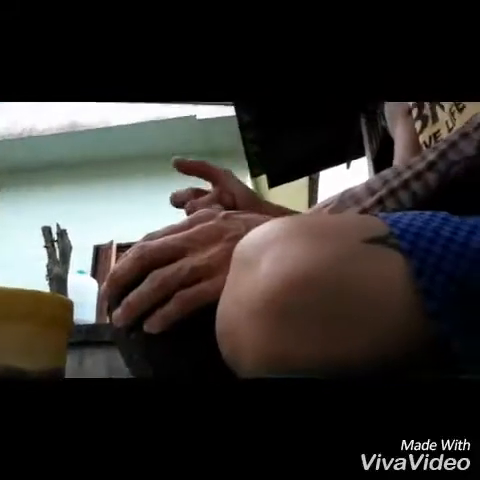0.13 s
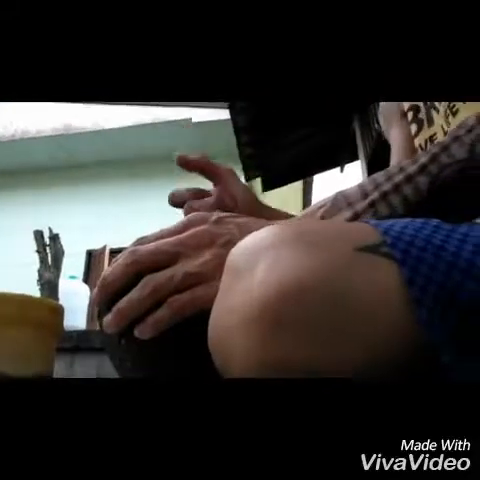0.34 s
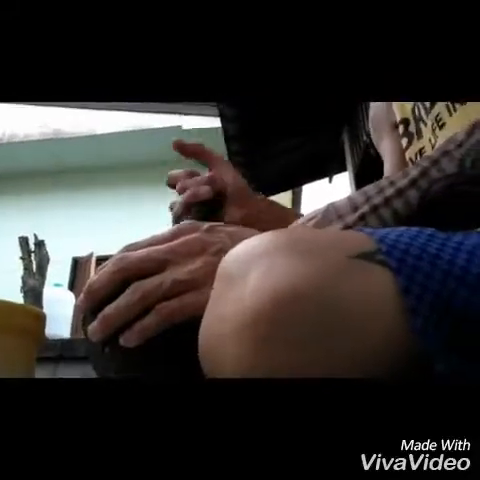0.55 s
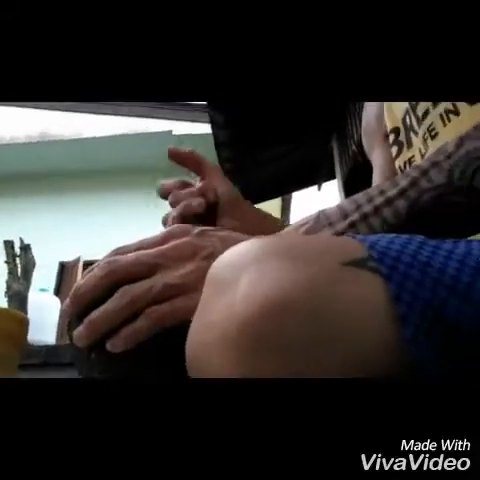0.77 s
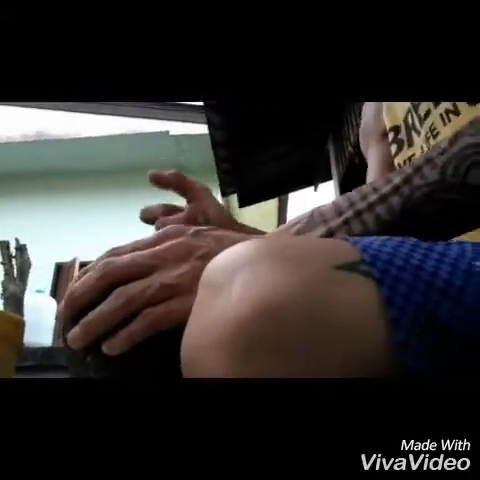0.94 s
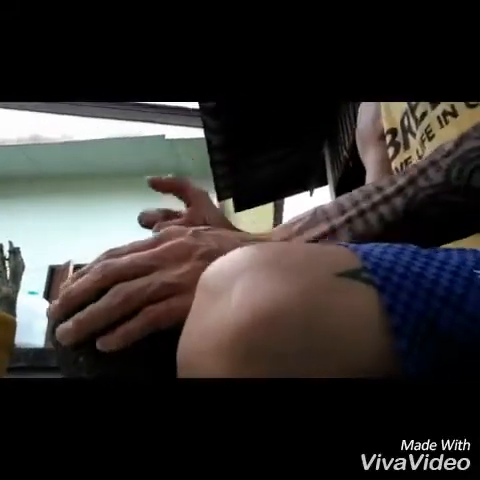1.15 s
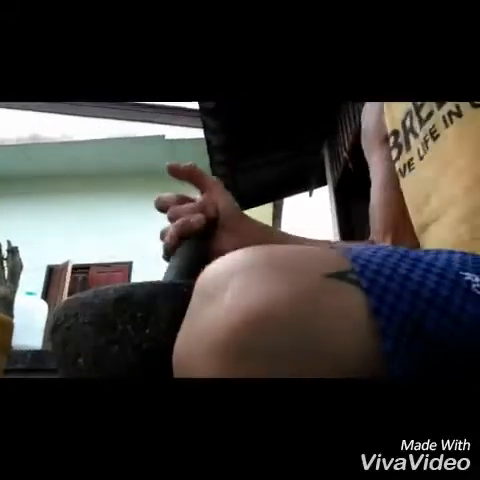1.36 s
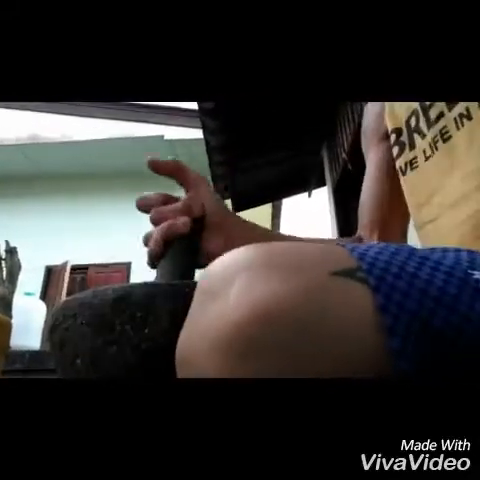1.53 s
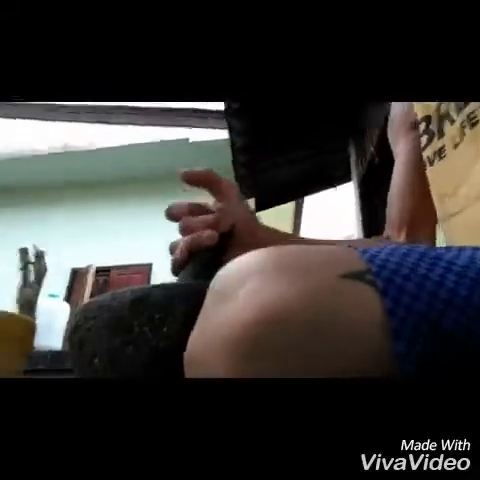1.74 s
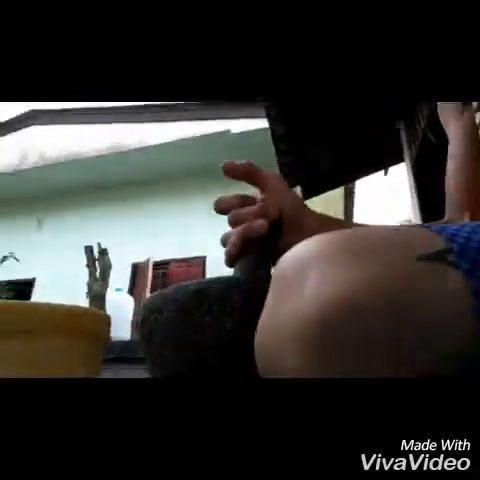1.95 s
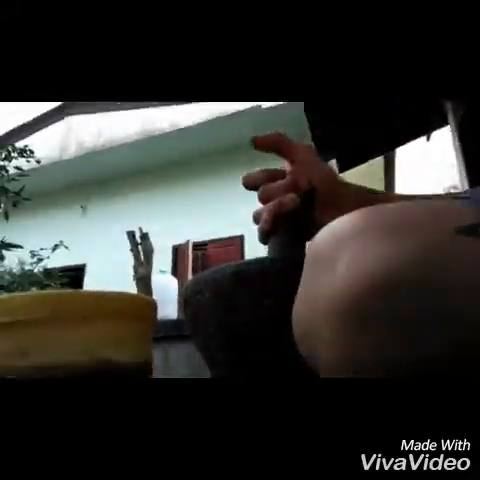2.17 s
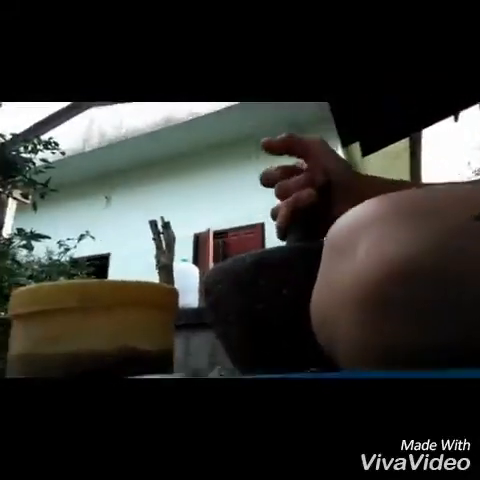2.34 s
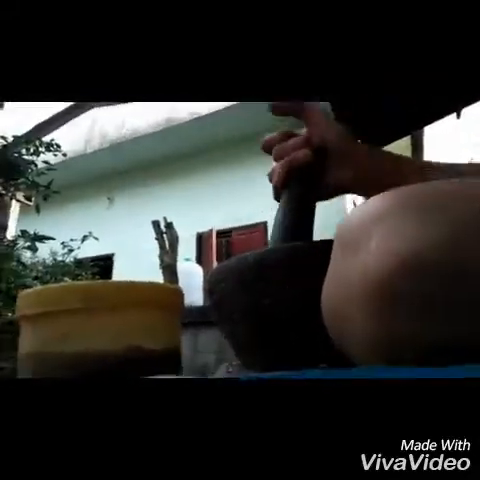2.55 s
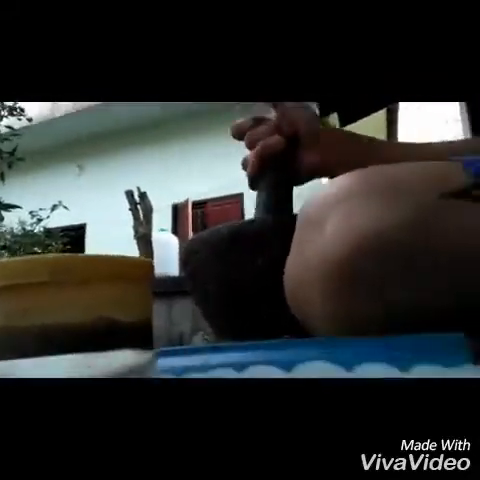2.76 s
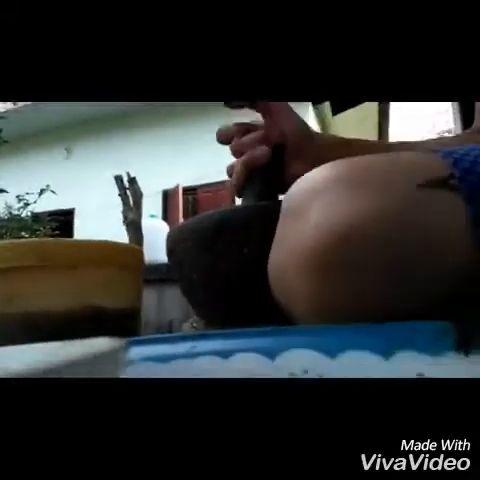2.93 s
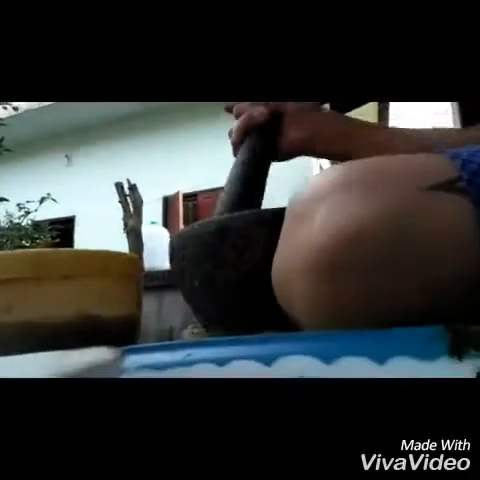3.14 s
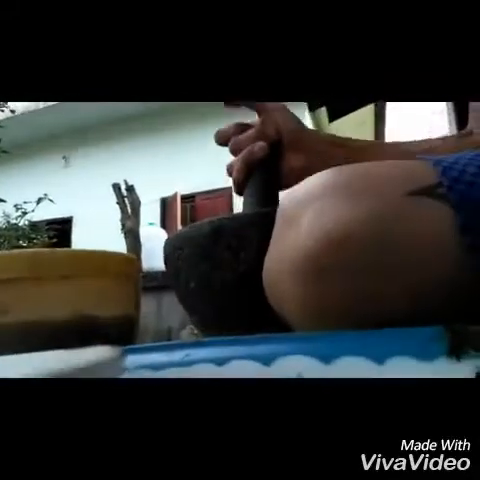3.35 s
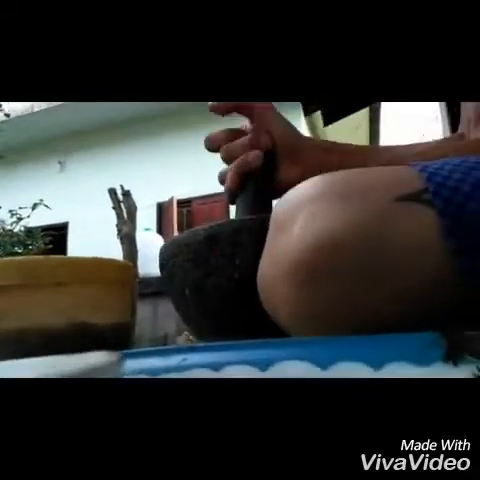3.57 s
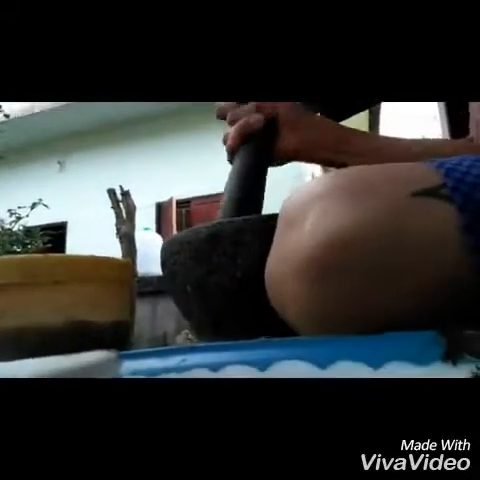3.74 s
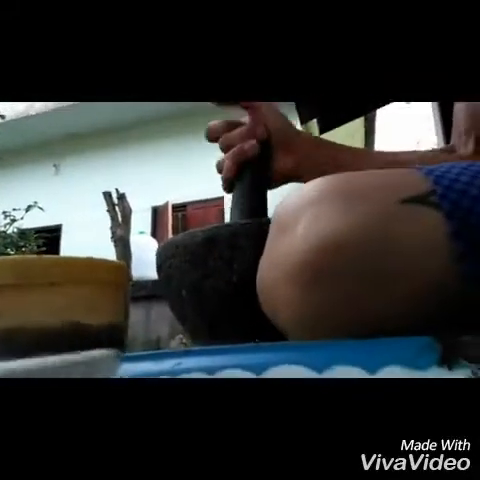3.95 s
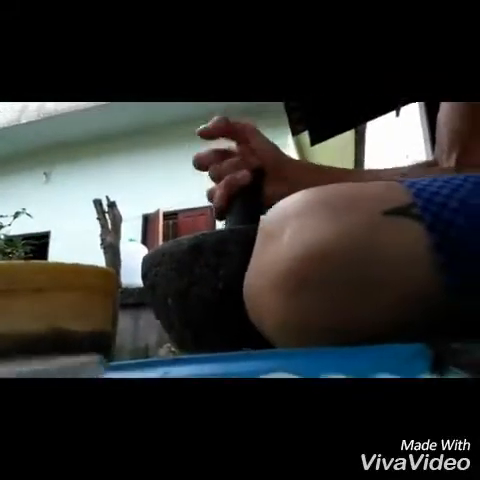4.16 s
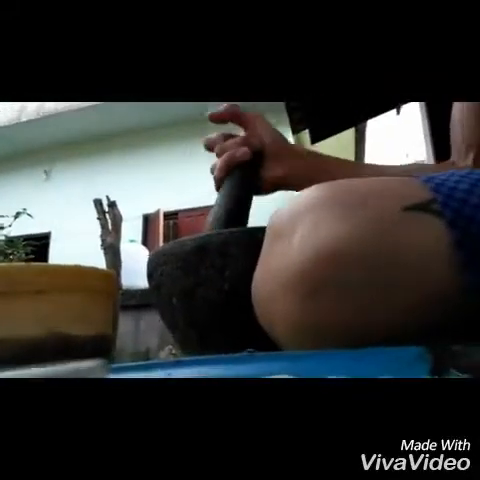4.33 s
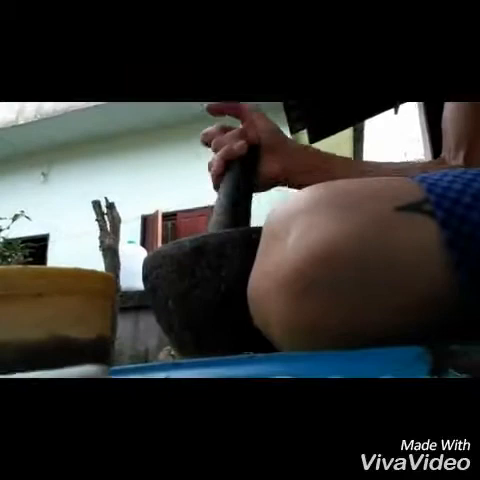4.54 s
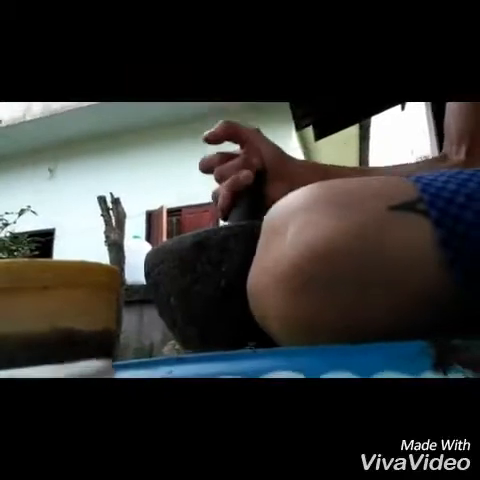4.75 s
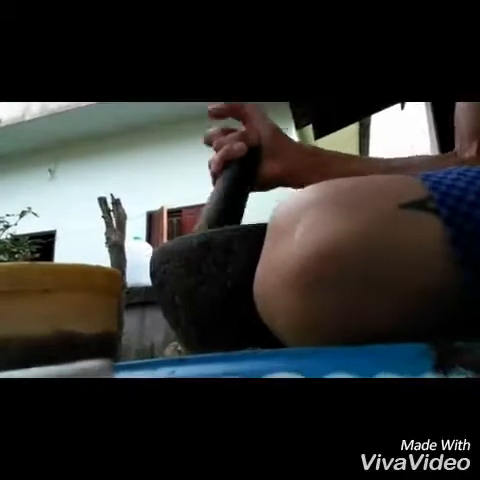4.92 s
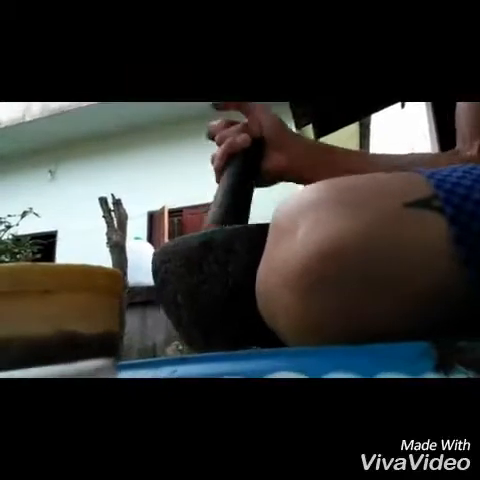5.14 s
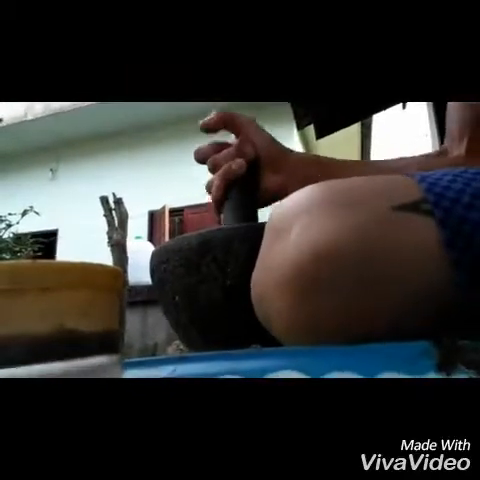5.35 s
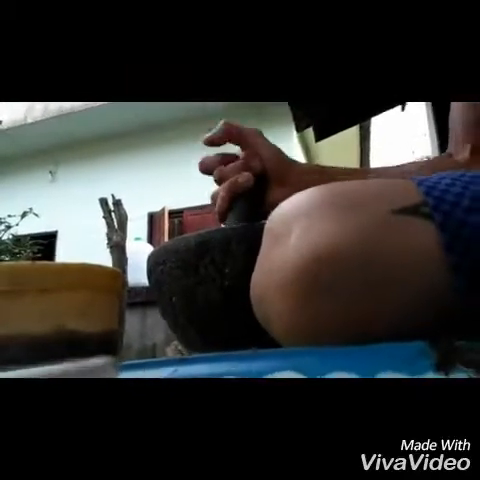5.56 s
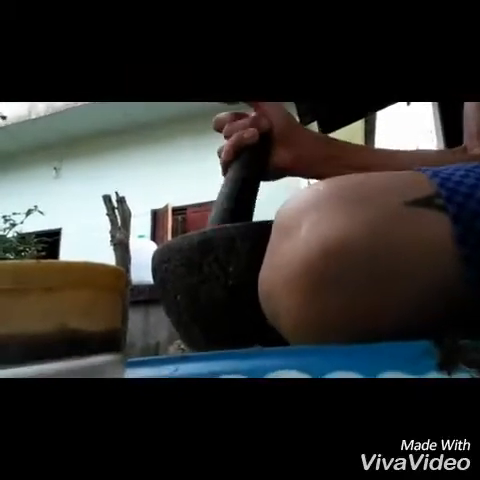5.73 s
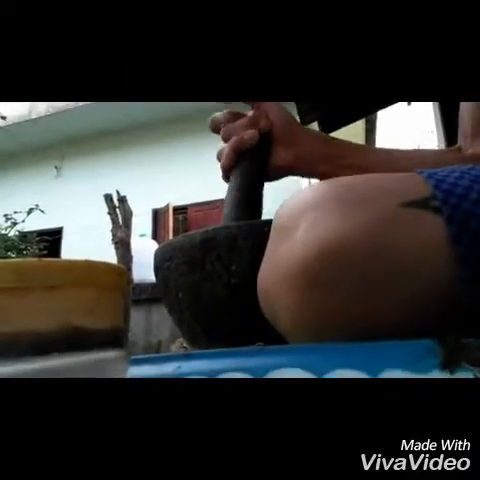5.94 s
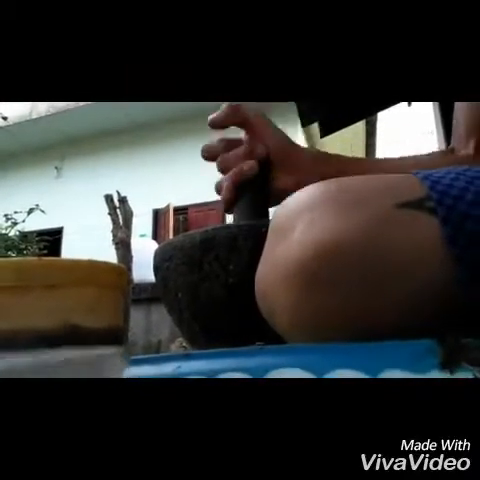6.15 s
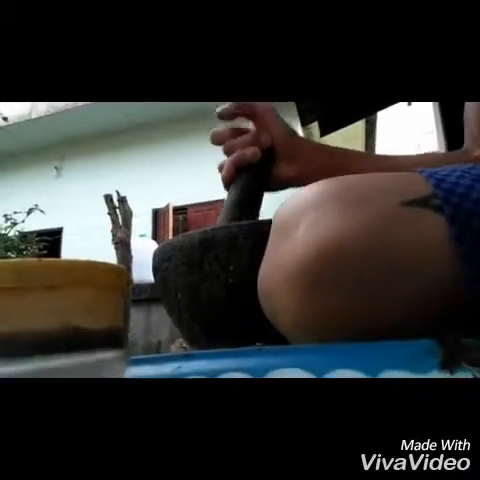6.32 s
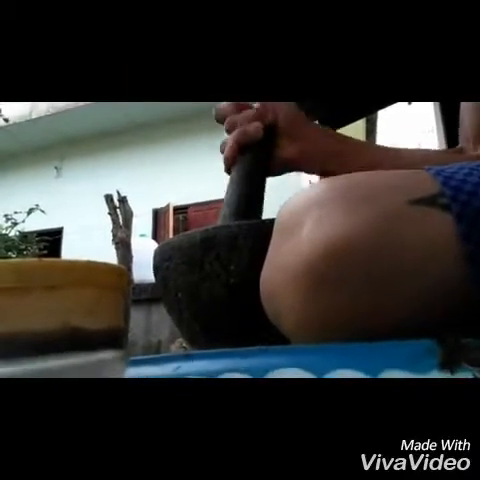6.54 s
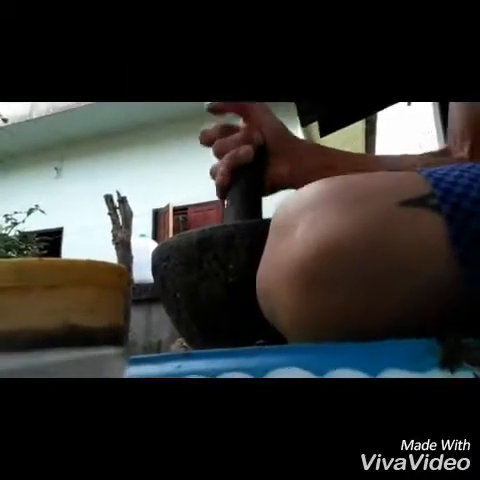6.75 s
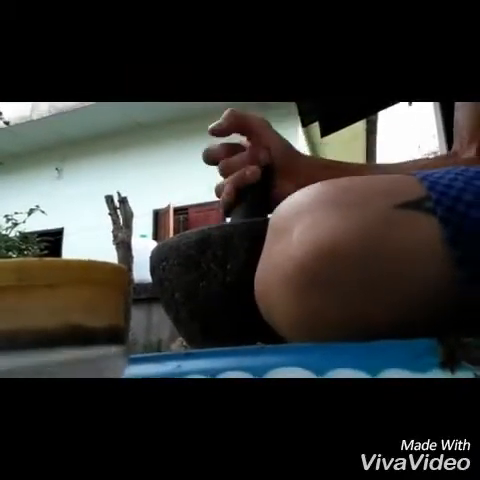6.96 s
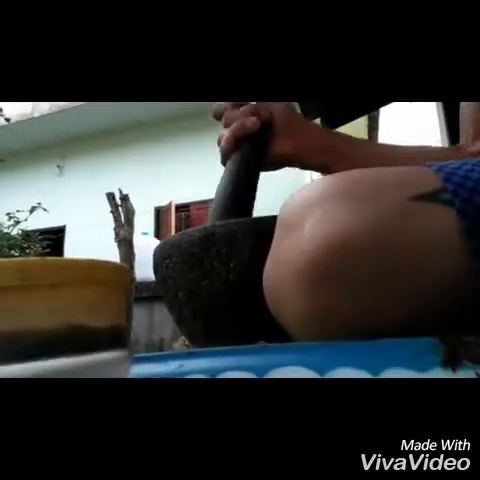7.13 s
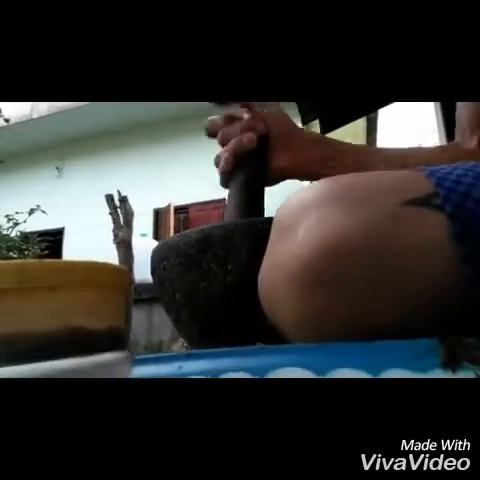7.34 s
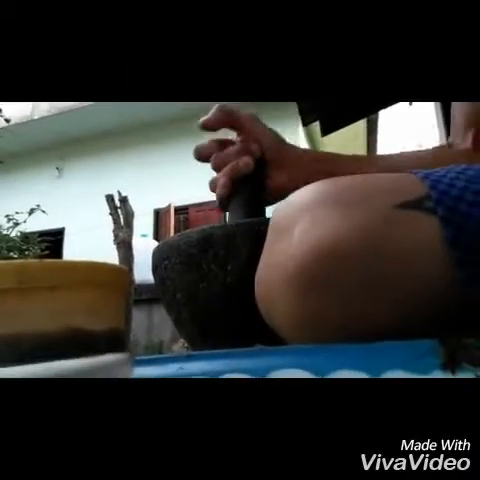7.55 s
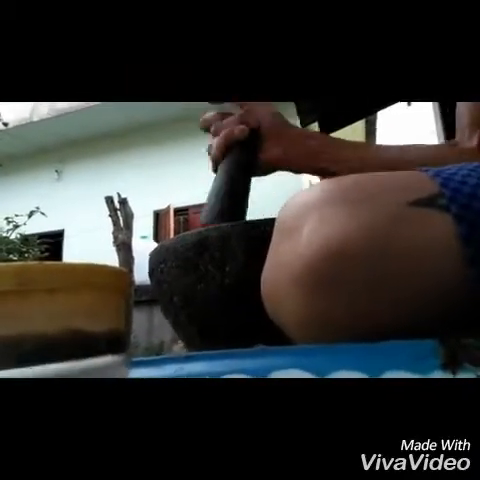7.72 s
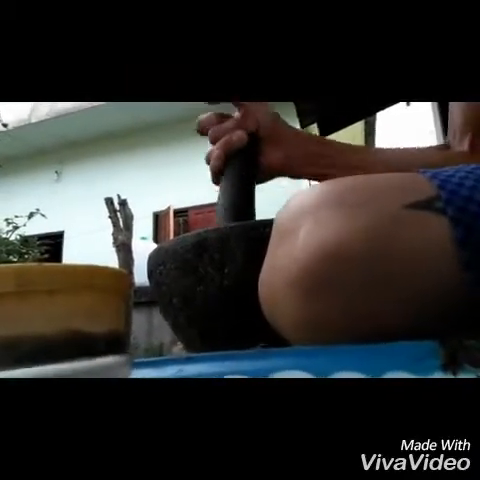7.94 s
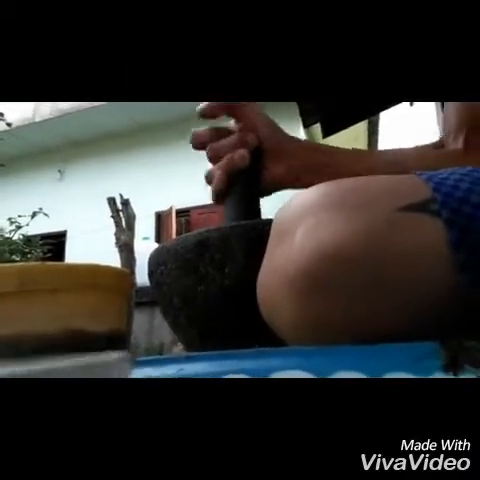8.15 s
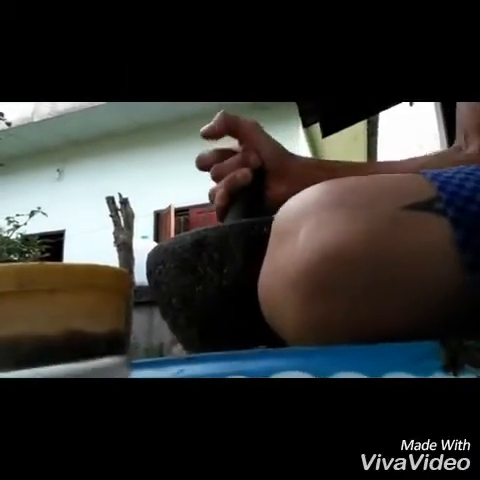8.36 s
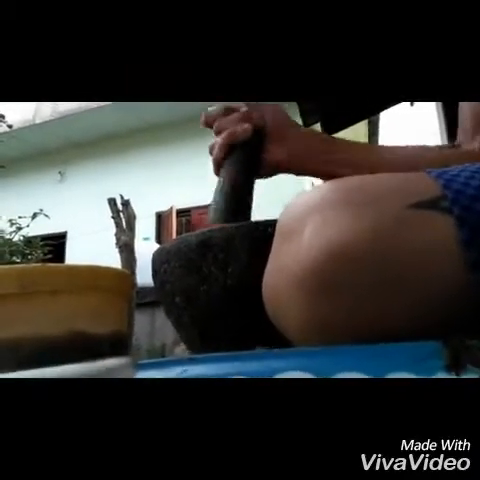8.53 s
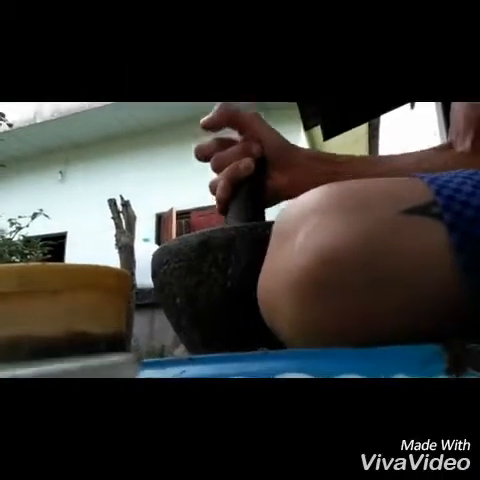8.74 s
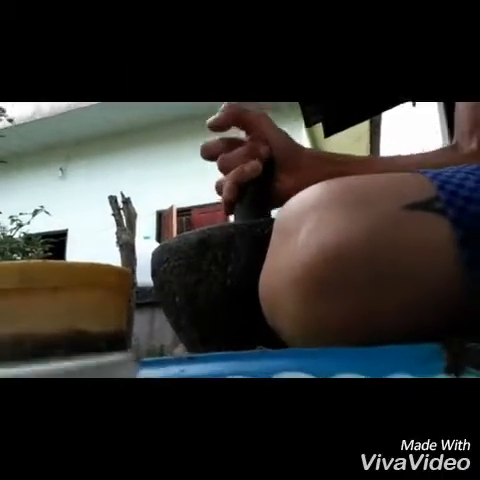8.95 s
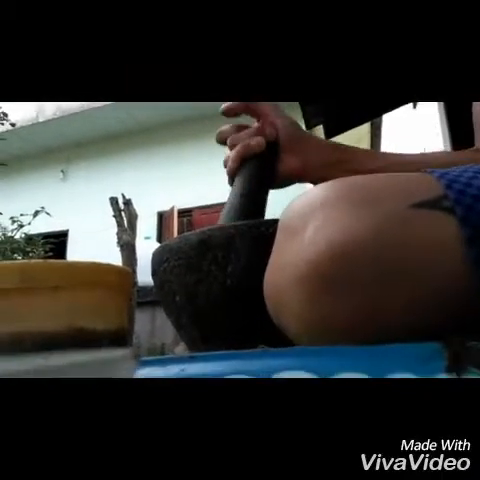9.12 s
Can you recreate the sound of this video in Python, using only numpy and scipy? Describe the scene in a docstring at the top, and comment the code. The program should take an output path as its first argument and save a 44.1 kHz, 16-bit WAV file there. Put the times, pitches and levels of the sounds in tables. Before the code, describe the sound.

A stone pestle pounds moist food in a heavy stone mortar, steady gritty knocks over three per second, pausing briefly early on, in a hard-walled porch.

```python
"""A stone pestle pounds moist ingredients in a stone mortar, about 3.5 blows a second, in a hard-walled porch.
Each blow squeezes food (swelling noise), knocks stone on stone (damped sines and noise) and grinds on (grit bursts).
The pestle taps the wall as it lifts; the stone's sines ring until the next contact, for half a second at most.
At first coarse pieces cover the stone and the blows are duller; small snaps, clicks and bumps join in over a rumble.
The recorder flattens loud blows and shortens quiet tails."""
import sys
import numpy as np
from scipy import signal
from scipy.fft import rfft, irfft, next_fast_len
from scipy.io import wavfile
from scipy.ndimage import uniform_filter1d, minimum_filter1d

SR = 44100
rng = np.random.default_rng(int(sys.argv[2]) if len(sys.argv) > 2 else 0)


def waveform_to_disk(signal):
    """Save audio, clipped to [-1, 1], as 16-bit WAV at the path in sys.argv[1]."""
    frames = np.transpose(np.atleast_2d(signal))
    scaled = np.clip(frames, -1, 1) * 32767
    samples = np.round(scaled).astype(np.int16)
    wavfile.write(sys.argv[1], SR, samples)


N = 405279
LENGTH = 21600  # samples in one short sound, about half a second
T = np.arange(LENGTH) / SR  # seconds
HZ = np.fft.rfftfreq(LENGTH, 1 / SR)

# The blows. Each row: start in seconds, force in dB, moment when the pestle lifts off in seconds,
# relative grind level in dB, relative ring level in dB.
BLOWS = [(0.054, -9.5, 0.13, -19, -42.5), (0.334, -7.5, 0.4, -12.5, -41), (0.605, -8, 0.68, -16.5, -40.5),
         (0.882, -9, 0.95, -10.5, -36.5), (1.143, -6, 1.23, -26.5, -40.5), (1.398, -28, 1.504, -42, -72),
         (1.694, -35, 1.65, -65, -65), (1.976, -16.5, 2.07, -47, -70), (2.601, -12, 2.7, -21, -61.5),
         (2.902, -9, 3.0, -13.5, -40.5), (3.212, -23.5, 3.321, -32.5, -68), (3.505, -9.5, 3.59, -9, -33),
         (3.8, -8.5, 3.923, -11.5, -18), (4.087, -5.5, 4.222, -12, -21.5), (4.372, -5, 4.529, -17, -51),
         (4.656, 0, 4.831, -13.5, -24.5), (4.948, -3, 5.102, -11.5, -44), (5.237, -11, 5.346, -19, -52),
         (5.511, -6.5, 5.674, -19, -43), (5.798, -4.5, 5.945, -17, -42), (6.063, -1, 6.232, -18, -33),
         (6.349, -11, 6.456, -21.5, -50), (6.63, -17.5, 6.746, -20.5, -53.5),
         (6.898, -6, 7.047, -20.5, -49), (7.191, 2, 7.365, -14.5, -9), (7.493, -11, 7.645, -23.5, -32),
         (8.068, -6.5, 8.252, -20.5, -42), (8.347, -7, 8.506, -21, -54), (8.63, -9, 8.791, -13.5, -22.5),
         (8.904, -7.5, 9.072, -15.5, -31), (9.179, -5, 9.34, -24, -28)]
# The pestle strays against the bowl's wall. Each row: start in seconds, relative level in dB, brightness in dB.
TOUCHES = [(1.872, -41.5, 4), (2.261, -44, -18), (2.515, -26.5, -16), (3.062, -27.5, -6), (3.124, -31, -13),
           (3.73, -39, 4), (3.776, -14.5, 4), (4.324, -22.5, -8), (5.159, -23, -1), (6.41, -9.5, -4),
           (7.548, -2.5, -6), (7.598, -12, 3.5), (7.81, -23.5, -7), (7.839, -11, -8), (8.433, -14, 8.5)]
# The long ring of the stone. Each row: pitch in Hz, relative level in dB, time to fall 60 dB in seconds.
STONE = [(838, -2, .38), (1055, -2, .42), (1540, -3, .3), (2336, -7, .5), (2670, -11, .35),
         (2826, -11, .35), (3327, -12, .45), (4339, -15, .8), (5621, 0, .29), (6843, -2, .37),
         (7858, -8, .27), (8236, -2, .5), (9582, -13, .55), (10169, -7, .25), (11322, -5, .5),
         (12887, -2, .22)]
# The stand under the mortar. Each row: pitch in Hz, relative level in dB, time to fall 60 dB in seconds.
STAND = [(51.6, 0, 0.22), (143, 0, 0.091), (301, -3.5, 0.18)]
# Hardness of the contact as the food shifts under the pestle. Each row: time in seconds, brightness in dB.
HARDNESS = [(0, -13), (1.15, -15.5), (1.45, -10), (3.8, -9.5), (4.4, -4), (5.5, -10.5), (6.35, -5),
            (7.2, -4), (8.05, -8.5), (8.6, -6), (9.2, -15)]
MUFFLED_S = 2.1  # until then coarse food covers the stone
FIRM_FORCE_DB = -15.5  # from this force on, a blow reaches the stone


def amp(db):
    """Turn decibels into a gain."""
    return 10 ** (np.asarray(db) / 20)


def unit(x):
    """Scale to an rms of 1."""
    return x / np.sqrt(np.mean(x ** 2) + 1e-20)


def along(points, hz):
    """Read (Hz, value) points joined by straight lines on a log frequency axis."""
    f, v = np.transpose(points)
    return np.interp(np.log(hz + 1), np.log(f + 1), v)


def law(points, x):
    """Read (x, value) points joined by straight lines."""
    return np.interp(x, *np.transpose(points))


def fade(t, t60):
    """Die away steadily, by 60 dB in t60 seconds."""
    return amp(-60 * t / t60)


def add(track, s, sound):
    """Mix a sound into the track at s seconds."""
    start = max(round(s * SR), 0)
    part = track[start:start + len(sound)]
    part += sound[:len(part)]


def damped(modes):
    """Make one dying sine for each way in which a body can vibrate (a mode)."""
    hz, db, t60 = np.transpose(modes)[:, :, None]
    return amp(db) * np.sin(2 * np.pi * hz * T) * fade(T, t60)


def ring(sines, scatter_db):
    """Add up the modes, each struck with a new strength and sign every time."""
    chance = np.clip(rng.standard_normal(len(sines)), -1.5, 1.5)
    strengths = amp(scatter_db * chance) * rng.choice([-1, 1], len(sines))
    return strengths @ sines


def causal(db):
    """Turn a gain in dB on HZ into a filter of unit power that responds as early as it can (minimum phase)."""
    cepstrum = irfft(np.log(unit(amp(db)) + 1e-6))
    cepstrum[1:LENGTH // 2] *= 2
    cepstrum[LENGTH // 2 + 1:] = 0
    return np.exp(rfft(cepstrum))


def coloured(x, response):
    """Pass a short sound through a filter."""
    return irfft(rfft(x) * response)


def clack(bright_db, covered=False, corner_hz=2600, neutral_db=-5, stone_db=8, stone_width_hz=130):
    """Filter of a stone contact: harder contact lifts the treble, a cover of food changes the colour."""
    # Resonances of bowl and porch. Each row: pitch in Hz, width in Hz, boost in dB.
    hollow = [(598.4, 43, 12), (842.5, 35, -7.5), (953, 17, 0), (1047, 15, 5.5), (1552.6, 42, 9.5),
              (1850, 120, 5), (2001, 54, 7.5), (2289, 50, 6.5), (2666, 23, 9.5), (2837, 61, 13.5),
              (6650, 150, 4.5)]
    # Colour of stone on stone. Each row: frequency in Hz, relative level in dB per Hz.
    stone_colour = [(150, -4.5), (380, -13), (450, -3), (660, -10.5), (850, 8.5), (1150, -4), (1400, 4.5),
                    (1800, -3), (2300, -8), (3400, -14.5), (5000, -10.5), (9000, -15), (12000, -19),
                    (14500, -25.5)]
    # Change made by coarse food covering the stone. Each row: frequency in Hz, change in dB.
    food_cover = [(200, -4.5), (450, 5), (750, 2.5), (1200, 10.5), (1600, 3), (2100, -1.5), (3000, -2),
                  (5000, 2), (9000, 4)]
    modes = list(hollow) + [(hz, stone_width_hz, stone_db) for hz, _, _ in STONE if hz > 3000]
    peaks = sum(db / (1 + (2 * (HZ - hz) / width) ** 2) for hz, width, db in modes)
    treble = 1 - 1 / (1 + (HZ / corner_hz) ** 4)
    hardness = (bright_db - neutral_db) * treble
    return causal(along(stone_colour, HZ) + peaks + hardness + covered * along(food_cover, HZ))


def porch(build):
    """Echoes off the walls: fresh noise that swells over build seconds and dies at its own rate in each band."""
    # Each row: frequency in Hz, time for the noise to fall 60 dB in seconds.
    decay_times = [(60, 0.23), (300, 0.2), (1000, 0.2), (2000, 0.19), (5000, 0.18), (14000, 0.1)]
    hz, t, z = signal.stft(rng.standard_normal(LENGTH), SR, nperseg=256)
    decay = fade(t, along(decay_times, hz)[:, None])
    tail = signal.istft(z * decay, SR, nperseg=256)[1][:LENGTH]
    return tail * (1 - np.exp(-(T / build) ** 2))


def crack(t60):
    """The brief burst of a contact: noise that dies away at once."""
    return rng.standard_normal(LENGTH) * fade(T, t60)


def mottled(x):
    """Every few milliseconds the grit breaks with another colour."""
    z = signal.stft(x, nperseg=256)[2]
    field = uniform_filter1d(rng.standard_normal(z.shape), size=5, axis=0)
    field = uniform_filter1d(field, size=3, axis=1)
    return signal.istft(z * amp(4.5 * unit(field)), nperseg=256)[1][:LENGTH]


def grind(length, start=0.029, slips_per_s=110, uneven_db=6, slip_t60=.035):
    """Grit breaks under the sliding pestle in clumps that echo in the porch; start and length in seconds."""
    chance, size = rng.random(LENGTH), rng.standard_normal(LENGTH)
    slips = (chance < slips_per_s / SR) * amp(uneven_db * np.clip(size, -2, 1.4))
    # every slip leaves a dying burst; their powers add up
    power = coloured(slips ** 2, rfft(fade(T, slip_t60) ** 2))
    clumps = np.sqrt(np.abs(power))
    stroke = (1 - np.exp(-(T / start) ** 2)) * np.exp(-(T / length) ** 6)
    noise = mottled(rng.standard_normal(LENGTH))
    grit = unit(clumps * stroke * noise) * np.sqrt(np.mean(stroke ** 2))
    echo = unit(porch(build=0.014)) / np.sqrt(LENGTH)
    return grit + amp(-4) * coloured(grit, rfft(echo))


def air(db=-68):
    """Faint outdoor rumble: steady noise, strongest in the bass."""
    # Each row: frequency in Hz, relative level in dB per Hz.
    air_colour = [(25, -19.5), (60, 11), (150, -13.5), (400, -8), (1400, -8.5), (4000, -38), (14000, -42)]
    size = next_fast_len(N)
    gain = amp(along(air_colour, np.fft.rfftfreq(size, 1 / SR)))
    rumble = irfft(rfft(rng.standard_normal(size)) * gain, size)[:N]
    return amp(db) * unit(rumble)


def bumps():
    """The mortar rocks and scrapes softly between blows: low stand modes and short grit."""
    # Each row: start in seconds, relative thud level in dB, relative scrape level in dB.
    rocking = [(1.784, -28, -63.5), (2.22, -67, -51.5), (2.255, -39.5, -54), (2.304, -45, -61),
               (2.343, -44, -55), (7.744, -19.5, -34.5)]
    out = np.zeros(N)
    for s, thud, scrape in rocking:
        stand = ring(damped(STAND[:2]), scatter_db=2)
        add(out, s, amp(thud) * stand * (1 - np.exp(-T / 0.03)))
        grit = grind(length=0.012, start=0.0041)
        add(out, s, amp(scrape) * coloured(grit, clack(bright_db=19)))
    return out


def clicks(click_db=4, echo_db=-28):
    """Sharp clicks so near that the porch hardly answers: very short noise with a faint echo."""
    # Dry clicks close to the microphone. Each row: start in seconds, relative level in dB, brightness in dB.
    near_clicks = [(2.769, -26, 8), (7.749, -11, -4)]
    out = np.zeros(N)
    for s, db, bright in near_clicks:
        burst = crack(t60=.012) + amp(echo_db) * porch(build=.005)
        add(out, s, amp(db + click_db) * coloured(burst, clack(bright)))
    return out


def lift_offs(tap_db=-15, coarse_db=-30, bright_db=6, brightens=0.21):
    """A stroke ends with a tap on the wall, padded by coarse food and brighter if the blow rings more."""
    # The pieces are crushed to a paste. Each row: time in seconds, coarseness from 0 to 1.
    coarseness = [(1.2, 1), (3.5, 0.03), (3.8, 0)]
    rows = []  # start in seconds, relative level in dB, brightness in dB
    for s, force, lift, _, ring_db in BLOWS:
        db = tap_db + min(force - FIRM_FORCE_DB, 0) + coarse_db * law(coarseness, s)
        rows.append((lift, db, bright_db + brightens * ring_db))
    return rows


def touches(crack_db=-5, echo_db=-7):
    """Light contacts with the bowl's wall: a noise burst and its echo through the stone filter."""
    out = np.zeros(N)
    for s, db, bright in lift_offs() + list(TOUCHES):
        echo = porch(build=0.00085) * fade(T, 0.35)
        burst = amp(crack_db) * crack(t60=0.074) + amp(echo_db) * echo
        add(out, s, amp(db) * coloured(burst, clack(bright)))
    return out


def squeals(share=.55, squeal_db=-7.5):
    """Part-way through the time down the pestle reaches bare stone and sets it ringing again."""
    # rows: start in seconds, relative ring level in dB
    return [(s + share * (lift - s), db + squeal_db) for s, _, lift, _, db in BLOWS]


def ringing(ring_db=-3, touch_db=-29, bareness=3.0, choke_t60=0.043):
    """The stone's modes ring freely until the next contact damps them and sets them ringing anew."""
    # The longer the pestle stays down, the less ring is left when it lifts.
    # Each row: time down in seconds, change of ring in dB.
    ring_left = [(.12, -8), (.155, -14), (.175, -46)]
    out = np.zeros(N)
    struck = [(s, db) for s, *_, db in BLOWS]
    lifted = [(lift, db + law(ring_left, lift - s)) for s, _, lift, _, db in BLOWS]
    # bright touches are on bare stone, so they ring more
    touched = [(s, db + touch_db + bareness * bright) for s, db, bright in TOUCHES]
    contacts = sorted(struck + squeals() + lifted + touched)
    sines = damped(STONE)
    ends = [s for s, _ in contacts[1:]] + [np.inf]
    for (s, db), end in zip(contacts, ends):
        choke = fade(np.maximum(T - (end - s), 0), choke_t60)
        stone = ring(sines, scatter_db=4.5)
        add(out, s, amp(db + ring_db) * stone * choke * (1 - np.exp(-T / 0.0054)))
    return out


def crumbs(count=3, crumb_db=-23, scatter_db=9, share=.7):
    """Every blow snaps a few small pieces while the pestle is down; soft blows snap them more faintly."""
    rows = []  # start in seconds, relative level in dB
    for s, force, lift, _, _ in BLOWS:
        delays = share * (lift - s) * (np.arange(count) + rng.random(count)) / count
        db = crumb_db + min(force - FIRM_FORCE_DB, 0)
        rows += zip(s + delays, db + scatter_db * rng.uniform(-1, 1, count))
    return rows


def snaps(db=-10, echo_db=-11):
    """Crisp pieces burst with a short, high spit of noise."""
    # The largest pieces snap under the pestle. Each row: start in seconds, relative level in dB.
    large_pieces = [(0.364, -6.5), (0.642, -10.5), (0.657, -5), (0.914, -10.5), (0.935, -1), (1.152, 1.5),
                    (1.173, 1), (3.827, -17), (4.71, -8), (4.743, -4.5), (5.008, -13), (5.288, -7),
                    (6.13, -10), (6.354, -8.5), (6.91, -1), (8.13, -9), (8.715, -7)]
    # Colour of the spit. Each row: frequency in Hz, relative level in dB per Hz.
    spit_colour = [(500, -34), (3000, -11), (7000, -7.5), (9800, -3), (10600, 5.5), (11400, -20),
                   (13000, -6), (14400, -29)]
    out, spit = np.zeros(N), causal(along(spit_colour, HZ))
    for s, level in list(large_pieces) + crumbs():
        burst = crack(t60=0.039) + amp(echo_db) * porch(build=.004)
        add(out, s, amp(level + db) * coloured(burst, spit))
    return out


def thumps(lead=0.01267, thump_db=-8, thump_grows=0.62, stand_db=-1, boom_db=2.0):
    """The weight of each blow shakes the stand (low sines) and booms in the porch (low noise)."""
    # Colour of the boom. Each row: frequency in Hz, relative level in dB per Hz.
    boom_colour = [(25, -28.5), (52, 8.5), (80, -1.5), (140, 2.5), (215, -4), (300, 4), (370, -10.5),
                   (700, -37.5), (2000, -69.5)]
    out, low = np.zeros(N), causal(along(boom_colour, HZ))
    for s, force, *_ in BLOWS:
        stand = ring(damped(STAND), scatter_db=0.5) * (1 - np.exp(-T / 0.016))
        boom = coloured(porch(build=0.029), low)
        thump = amp(stand_db) * stand + amp(boom_db) * boom
        add(out, s - lead, amp(thump_db + thump_grows * force) * thump)  # grows in dB per dB of force
    return out


def cushion(force, flat_force_db=-2, flat_db=-11, grows=1):
    """Basic level in dB of the push through the food, which stops growing once the food is squeezed flat."""
    return flat_db + grows * min(force - flat_force_db, 0)


def squeeze(squelch_db=-9, dull_db=-6):
    """The food squelches just before the stones meet: a dull noise that swells and dies."""
    # Softer blows sink into the food for longer. Each row: force in dB, seconds before the knock.
    sink = [(-28.5, .032), (-8.5, 0.018), (5.5, 0.0033)]
    out = np.zeros(N)
    for s, force, *_ in BLOWS:
        response = clack(law(HARDNESS, s) + dull_db, s < MUFFLED_S)
        squelch = coloured(porch(build=0.0069), response)
        add(out, s - law(sink, force), amp(cushion(force) + squelch_db) * squelch)
    return out


def crushing(echo_db=0, grind_db=1, grit_bright_db=6, echo_delay=.007, grind_share=0.68):
    """The walls answer each knock while the pestle grinds on for part of its time down."""
    out = np.zeros(N)
    for s, force, lift, grit_db, _ in BLOWS:
        bright, covered = law(HARDNESS, s), s < MUFFLED_S
        echo = coloured(porch(build=0.0021), clack(bright - 2, covered))
        add(out, s + echo_delay, amp(force + echo_db) * echo)
        grit = grind(grind_share * (lift - s))
        grit = coloured(grit, clack(bright + grit_bright_db, covered))
        add(out, s, amp(grit_db + grind_db) * grit)
    return out


def knocks(crack_db=-4, dull_db=-8, cushion_db=6, lead=.0075, ping_db=7, hardening=2.0, knock_db=2):
    """A dull push through the food, then stone meets stone in a compact knock of dying sines and noise."""
    # The dull push. Each row: pitch in Hz, relative level in dB, time to fall 60 dB in seconds.
    push_modes = [(283, -2, 0.034), (540, -7.5, 0.004), (756, -6, 0.018)]
    # The short knock of the bowl. Each row: pitch in Hz, relative level in dB, time to fall 60 dB in seconds.
    bowl_modes = [(780, 0, .03), (930, 3, .032), (1150, 1, .025), (1540, 0, .028)]
    out = np.zeros(N)
    for s, force, *_ in BLOWS:
        bright = law(HARDNESS, s)
        push = ring(damped(push_modes), scatter_db=1.5)
        add(out, s - lead, amp(cushion(force) + cushion_db) * push)
        # food absorbs soft blows, so the knock grows faster than the force
        knock = ring(damped(bowl_modes), scatter_db=1.5)
        add(out, s - .001, amp(knock_db + hardening * force) * knock)
        burst = coloured(crack(t60=.05), clack(bright + dull_db, s < MUFFLED_S))
        add(out, s - .001, amp(force + crack_db) * burst)
        # the pestle pings far more in bright blows on bare stone
        ping = np.sin(2 * np.pi * 5400 * T) * fade(T, 0.011)
        add(out, s, amp(force + 2 * bright + ping_db) * ping)
    return out


def pounding():
    """All parts of the blows together, with the snapping pieces."""
    return squeeze() + thumps() + knocks() + crushing() + snaps()


def scene():
    """All sounds at one microphone."""
    return (air() + bumps() + clicks() + touches() + ringing() + pounding())[None]


def suppressor(x, depth_db=-14):
    """Bands that sink towards the noise floor are turned down, so tails end early."""
    # Level around which a band is turned down. Each row: frequency in Hz, level in dB per bin.
    quiet = [(100, -100), (1000, -95), (2500, -88), (5000, -81), (14000, -87)]
    hz, t, z = signal.stft(x, SR, nperseg=512)
    power = uniform_filter1d(np.abs(z) ** 2, size=3, axis=1)
    power = np.abs(uniform_filter1d(power, size=3, axis=2))
    gain = power / (power + amp(along(quiet, hz))[:, None] ** 2)
    return signal.istft(z * np.maximum(gain, amp(depth_db)), SR, nperseg=512)[1][:, :N]


def limiter(x, top_db=-3, hold=0.0089):
    """Turns the gain down around peaks that pass the ceiling; hold in seconds."""
    needed = np.minimum(1, amp(top_db) / (np.abs(x) + 1e-9))
    width = max(int(hold * SR), 2)
    lowest = minimum_filter1d(needed, width)
    return x * uniform_filter1d(lowest, width // 2 + 1)


def record(dry, low_hz=30, top_hz=14650):
    """Noise suppressor, limiter, then the recorder's band limits."""
    size = next_fast_len(N + SR // 4)
    hz = np.fft.rfftfreq(size, 1 / SR)
    keep = hz ** 4 / (hz ** 4 + low_hz ** 4) / (1 + (hz / top_hz) ** 160)
    limited = limiter(suppressor(dry))
    return irfft(rfft(limited, size) * keep, size)[:, :N]


dry = scene()
out = record(dry)
waveform_to_disk(out)
```